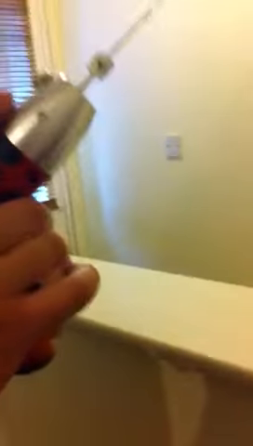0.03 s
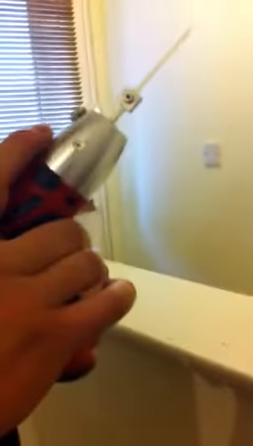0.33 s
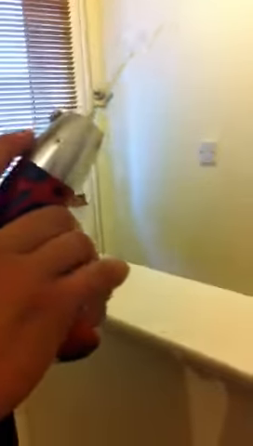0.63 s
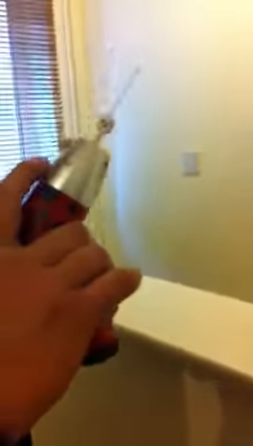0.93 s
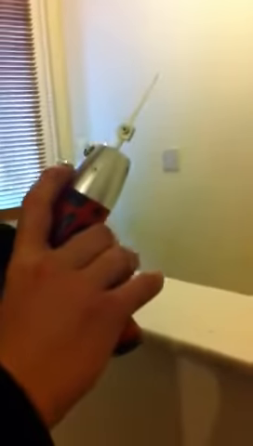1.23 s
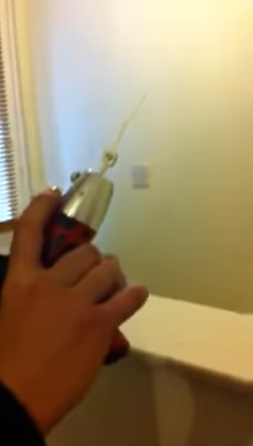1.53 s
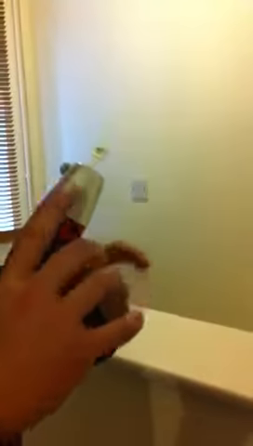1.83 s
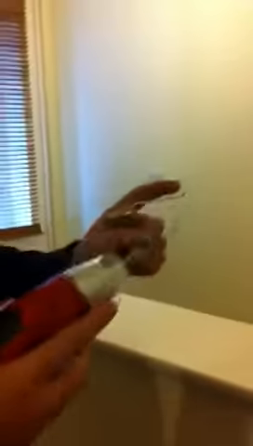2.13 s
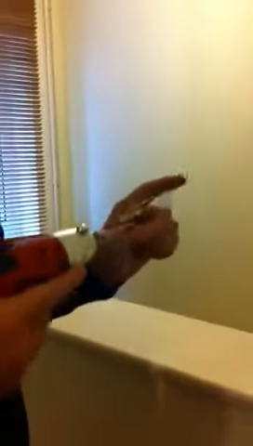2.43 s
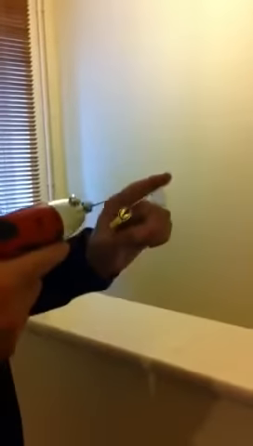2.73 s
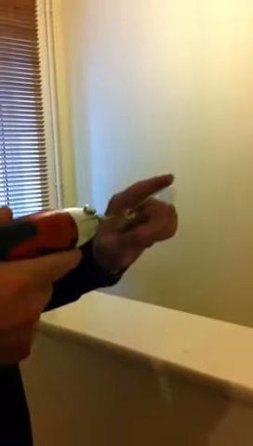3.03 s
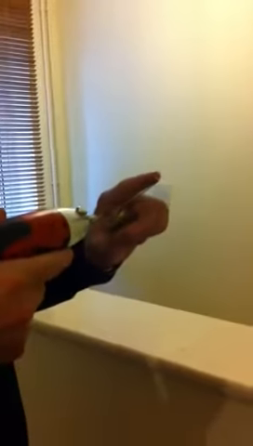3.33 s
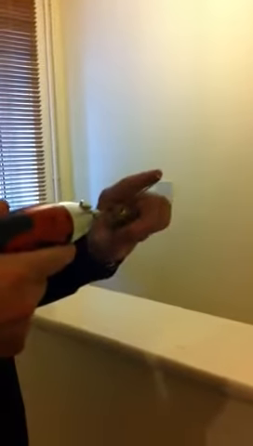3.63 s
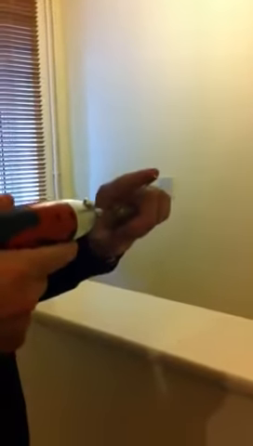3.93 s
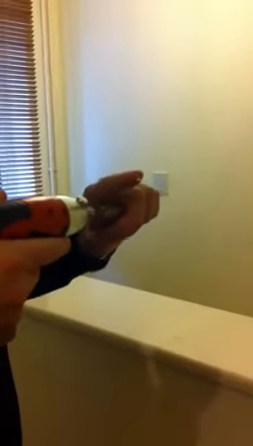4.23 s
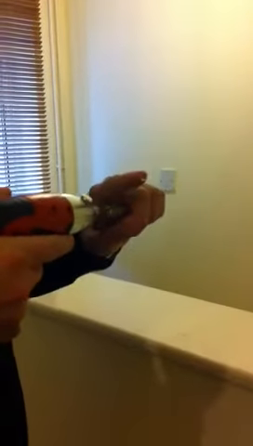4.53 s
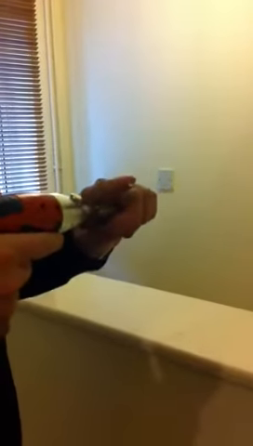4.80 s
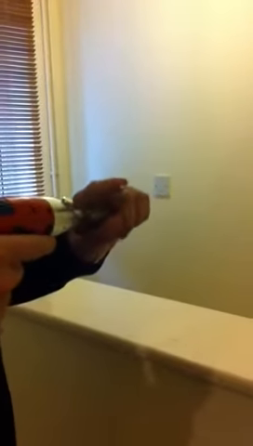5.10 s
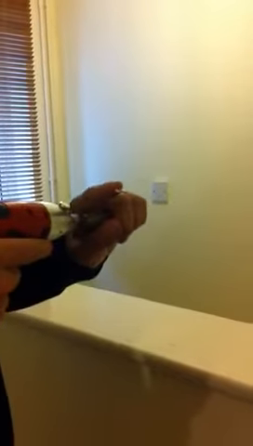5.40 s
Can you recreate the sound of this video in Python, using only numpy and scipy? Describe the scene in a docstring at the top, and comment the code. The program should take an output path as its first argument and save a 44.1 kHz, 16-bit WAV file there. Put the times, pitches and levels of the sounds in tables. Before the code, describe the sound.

An electric lock pick is fitted into a lock with faint clicks, then buzzes harshly against the pins in three quick bursts.

```python
"""In a small, humming room, an electric pick gun is fitted into a hand-held lock cylinder.
The tool knocks in the hand and its needle ticks and squeaks in the keyway. Three pulls of the trigger
then spin the motor up, slapping the needle against the pins up to 195 times a second. The periodic
impacts excite the modes of needle, lock and housing, while pins and springs chatter in noisy bursts.
Mains hum, room noise and the rustle of hands lie beneath."""
import sys
import numpy as np
from scipy import signal
from scipy.fft import rfft, irfft, next_fast_len
from scipy.io import wavfile
from scipy.ndimage import uniform_filter1d

SR = 44100
rng = np.random.default_rng(int(sys.argv[2]) if len(sys.argv) > 2 else 0)


def wav_record(signal):
    """Record a signal, one row per channel, as 16-bit PCM in the file named by sys.argv[1]."""
    frames = np.transpose(np.atleast_2d(signal))
    bounded = np.clip(frames, -1, 1)
    # unit amplitude maps onto the largest positive 16-bit level
    quanta = np.round(bounded * 32767).astype(np.int16)
    wavfile.write(sys.argv[1], SR, quanta)


N = 245195
T = np.arange(N) / SR
CUTOFF_HZ = 15750

# pulls of the trigger: pressed t/s, released t/s, top stroke rate f/Hz
TRIGGER_PULLS = [(4.622, 4.8067, 192.9), (4.914, 5.1198, 195.2), (5.227, 5.6, 192.7)]
# how hard each pull works: needle ring level/dB, pin chatter level/dB, shudder level/dB
PULL_LEVELS = [(-27.7, -28.5, -46.5), (-29, -27.8, -52), (-26.3, -27.9, -59)]
SLOW_HZ, FULL_HZ = 130, 190  # the needle's swing builds up between these stroke rates
# resonances of needle, lock and housing: f/Hz, bandwidth/Hz, level/dB
TOOL_MODES = [(1535, 60, -12), (1730, 70, 1), (2300, 110, -5), (2500, 90, -3), (2690, 110, 2),
              (2890, 90, -3), (3080, 90, 1), (3275, 90, 2), (3660, 110, -7), (3840, 100, -5),
              (4200, 130, -8), (4800, 130, -3), (5370, 120, -5), (10580, 350, -5)]
# spectrum of the pin chatter: f/Hz, relative density level/dB
CHATTER_SPECTRUM = [(90, -57), (180, -35), (420, -23.5), (560, -17), (800, -11), (1100, -3), (1400, -12),
                    (2000, -5), (3000, -1.7), (5200, 0.7), (6200, -7.5), (7500, -4), (11000, 1.5),
                    (15500, -4.5)]
# the lock body rings up when the needle presses on it: t/s, f/Hz, level/dB, half-width/s
LOCK_RINGS = [(4.965, 4400, -37, .025), (5.5, 4330, -36, .035), (5.53, 3830, -39, .04)]
# drone of the housing at full swing: harmonic number, level/dB, change when leant on/dB
DRONE_HARMONICS = [(2, -68, 0), (3, -64, 0), (4, -45, 2.5), (5, -43.5, -3.5), (6, -41, -9), (7, -55, -2)]

# small contacts of tool, needle and pins: t/s, level/dB, decay time/s, ring f/Hz
KEYWAY_TICKS = [(3.458, -39.5, 0.005, 3150), (3.748, -51, 0.0044, 3750), (3.904, -56, 0.007, 3900),
                (3.928, -47, .006, 11800), (4.052, -52, .006, 4040), (4.068, -51, 0.0046, 6400),
                (4.1385, -52, 0.0066, 4000), (4.236, -50.5, .003, 4200), (4.247, -51, 0.0082, 7800),
                (4.272, -39.5, 0.0045, 4530), (4.283, -43, 0.0055, 12500), (4.314, -49, 0.015, 7200),
                (4.345, -51.5, 0.011, 5300), (4.36, -49.5, 0.0035, 3930)]
# spectrum of their scrape: f/Hz, relative density level/dB
SCRAPE_SPECTRUM = [(1000, -12), (2300, -14), (2900, -8.5), (4200, -5), (5500, -3.5), (6500, -13),
                   (9000, -12), (12000, -15), (16000, -10)]
# squeaks of the needle sliding into the keyway: t/s, f/Hz, level/dB, half-width/s
SQUEAKS = [(3.03, 2350, -74, 0.049), (3.345, 1823, -69.5, 0.049)]
# spectrum of a knock on the plastic housing: f/Hz, relative density level/dB
KNOCK_SPECTRUM = [(40, -54), (110, -6), (190, 2), (340, -4.5), (700, 5.5), (1000, 4), (1300, -2),
                  (1600, -22), (2000, -7.5), (2600, -20), (3300, -14.5), (5300, -15), (7700, -18.5),
                  (9500, -30), (16000, -38)]
# dull bumps of the tool against hand and lock: t/s, body level/dB, scuff level/dB
BUMPS = [(1.041, -59, -58), (2.9333, -46, -59), (3.22, -45.5, -59)]
# modes excited by a bump: f/Hz, level/dB, T60/s
BUMP_MODES = [(218, -4.5, 0.11), (620, -1, 0.097), (1105, -7.5, 0.042), (1920, -24, .025),
              (3300, -14.5, 0.021)]
# spectrum of a bump's scuff: f/Hz, relative density level/dB
SCUFF_SPECTRUM = [(100, -63), (600, 9), (2000, 11), (2700, -2), (6000, -11), (16000, -25)]

# slides of the hand on the tool: t/s, level/dB, half-width/s
HAND_SLIDES = [(0.447, -68, .06), (0.65, -68.5, .05), (1.427, -68, 0.069), (2.303, -71, 0.19),
               (2.616, -70, .05), (3.35, -73, 0.11)]
# spectrum of hands and sleeves: f/Hz, relative density level/dB
RUSTLE_SPECTRUM = [(200, -8), (700, 4), (1900, -0.5), (3000, -2), (7000, -9), (16000, -22)]
# mains hum: f/Hz, level/dB, change at the listener's starting spot/dB
HUM_PARTIALS = [(196.2, -76, 11), (300.5, -68.5, -6), (599, -75, 4), (696, -77.5, -2)]
# spectrum of the room noise: f/Hz, relative density level/dB
ROOM_SPECTRUM = [(25, -41), (60, -49), (80, -33), (114, -16.5), (190, -7.5), (300, -6), (420, -12),
                 (620, -13.5), (760, -17), (1840, -21.5), (2760, -29), (6000, -31), (14800, -33)]


def pick_gun():
    """Periodic impacts: one blow per motor turn drives ring and chatter; the housing shakes."""
    speed = motor_speed()
    turns = np.cumsum(speed) / SR
    ring_db, chatter_db, shudder_db = per_pull(PULL_LEVELS).T
    blows = contacts(turns, lag=0, jitter_s=.000008, spread_db=1)
    pitched = disperse(needle_ring(blows, speed, ring_db), spread_s=.000492) + drone(speed, turns)
    noisy = disperse(pin_chatter(blows, speed, turns, chatter_db), spread_s=.000962)
    noisy += shudder(speed, shudder_db)
    return room(pitched, t60=.25, wet_db=-12) + room(noisy, t60=.22, wet_db=-3)


def motor_speed(kick_hz=32, spin_up_s=.0396, friction_hz_per_s=572):
    """First-order lag: the stroke rate in Hz nears its top under power; friction slows it evenly."""
    speed = np.zeros(N)
    for pressed, released, top in TRIGGER_PULLS:
        at = int(pressed * SR)
        start, t = max(speed[at], kick_hz), T[at:]
        powered = np.minimum(t, released) - pressed
        slowing = friction_hz_per_s * np.maximum(t - released, 0)
        speed[at:] = top + (start - top) * np.exp(-powered / spin_up_s) - slowing
    return speed


def per_pull(values):
    """Each pull's value, held until the next pull."""
    return np.asarray(values)[np.searchsorted([row[0] for row in TRIGGER_PULLS[1:]], T)]


def coasting():
    """Seconds since the trigger was let go; 0 under power."""
    return np.maximum(T - per_pull([row[1] for row in TRIGGER_PULLS]), 0)


def swing(speed):
    """Relative amplitude of the needle: 0 when the motor is slow, 1 at full speed."""
    return np.clip((speed - SLOW_HZ) / (FULL_HZ - SLOW_HZ), 0, 1)


def octaves(speed, floor_hz=32):
    """Motor speed in octaves from full speed."""
    return np.log2(np.maximum(speed, floor_hz) / FULL_HZ)


def lean(start_s=5.405, rise_s=.053):
    """Contact load, 0 to 1: late in the last pull the needle is leant on the pins."""
    return np.clip((T - start_s) / rise_s, 0, 1)


def contacts(turns, lag, jitter_s, spread_db):
    """Impulse train: one click per turn, late by `lag` of a turn, uneven in time and strength."""
    count = int(turns[-1] - lag) + 1
    timing, strength = rng.standard_normal((400, 2))[:count].T
    times = np.interp(np.arange(count) + lag + 1e-9, turns, T) + jitter_s * timing
    at = np.clip(times * SR, 0, N - 2)
    force, out = from_db(spread_db * strength), np.zeros(N)
    np.add.at(out, at.astype(int), force * (1 - at % 1))
    np.add.at(out, at.astype(int) + 1, force * (at % 1))
    return out


def needle_ring(blows, speed, effort_db, db_per_octave=2.5, slack_db=-6):
    """Forced resonance: repeated blows give harmonic lines under the modes, and a short bright snap."""
    drive_db = db_per_octave * octaves(speed) + slack_db * (1 - swing(speed) ** 3)
    # the blows soften off the trigger, and leaning damps the needle
    damping_db = -.5 * np.minimum(coasting() / .016, 1) - 6.5 * lean()
    modes = sum(from_db(db) * resonate(blows, hz, width) for hz, width, db in TOOL_MODES)
    snap = .13 * resonate(blows, 4340, 900)
    ring = (swing(speed) ** 2 + .17) * modes + snap
    ring = highpass(ring, 1400, order=4)  # the ring sounds only above about 1.4 kHz, leaving the low band to the drone
    return from_db(effort_db + drive_db + damping_db) * evened(ring)


def pin_chatter(blows, speed, turns, effort_db, db_per_octave=4, lean_db=1.2, burst_s=.0014):
    """Impact and rebound: every stroke throws the pins, which clash and rattle on until the next."""
    level_db = effort_db + db_per_octave * octaves(speed) + lean_db * lean()
    rebounds = from_db(-7) * contacts(turns, lag=.36, jitter_s=.00023, spread_db=6)
    bursts = signal.lfilter([1], [1, -np.exp(-1 / (burst_s * SR))], blows + rebounds + 1e-18)
    loose = from_db(-15 + 2 * drift(900)) * (turns > 0)  # rattle between the bursts
    rattle = (bursts + loose) * rng.standard_normal(N)
    slap = np.diff(blows, prepend=0)  # the needle's bright click leads each burst
    chatter = colour(rattle + slap, CHATTER_SPECTRUM)
    lock = sum(from_db(db) * swell(s, half_width) * evened(resonate(rattle, hz, 180))
               for s, hz, db, half_width in LOCK_RINGS)
    return from_db(level_db + .2 * drift(30)) * evened(chatter) + lock


def disperse(x, spread_s):
    """Dispersion of bending waves in thin steel: the highs arrive first, the lows later."""
    size = next_fast_len(N + 4096)
    hz = np.fft.rfftfreq(size, 1 / SR)
    delay = spread_s * np.clip(1 - hz / CUTOFF_HZ, 0, 1) ** 2
    phase = 2 * np.pi * np.cumsum(delay) * SR / size
    return irfft(rfft(x, size) * np.exp(-1j * phase), size)[:N]


def drone(speed, turns, slack_db=-14):
    """Forced vibration: the housing shakes at harmonics of the stroke rate, weakly at low speed."""
    gain = from_db(slack_db * (1 - swing(speed)) ** 2) * (speed / FULL_HZ) ** 2
    tone = np.zeros(N)
    for harmonic, db, lean_db in DRONE_HARMONICS:
        amplitude = np.sqrt(2) * from_db(db + lean_db * lean() + 1.3 * drift(60))
        tone += amplitude * np.cos(2 * np.pi * harmonic * turns + .18 * drift(50))
    return gain * tone


def shudder(speed, effort_db, critical_hz=174, span_hz=11.5, floor_db=-72):
    """Critical speed: the housing rumbles in two resonances, most as the motor climbs through it."""
    critical = np.exp(-((speed - critical_hz) / span_hz) ** 2) * (coasting() == 0)
    level = from_db(effort_db) * critical + from_db(floor_db) * (speed > 0)
    shake = highpass(rng.standard_normal(N), 150, order=4)  # a small housing radiates little bass
    low, upper = (rms_one(resonate(resonate(shake, hz, 120), hz, 120)) for hz in (198, 500))
    return level * (low + from_db(-4) * upper)


def keyway_ticks(scrape_db=-9, ring_db=1):
    """Sliding contact: the needle catches a pin and scrapes over it; each contact rings briefly."""
    friction = from_db(3 * drift(1500)) * rng.standard_normal(N)
    slips, rings = np.zeros(N), np.zeros(N)
    for s, db, decay_s, hz in KEYWAY_TICKS:
        slip = from_db(db) * dying(s, decay_s) * friction
        slips += slip
        rings += resonate(slip, hz, 650)
    return from_db(ring_db) * rings + from_db(scrape_db) * colour(slips, SCRAPE_SPECTRUM)


def squeaks(width_hz=50):
    """Frictional excitation: steel rubbing on brass sings in one narrow resonance."""
    out = np.zeros(N)
    for s, hz, db, half_width in SQUEAKS:
        tone = rms_one(resonate(rng.standard_normal(N), hz, width_hz))
        out += from_db(db) * swell(s, half_width) * tone
    return out


def handling(knock_s=1.6836, knock_db=-14, scuff_s=.017):
    """Impulse responses: a hollow knock on the housing, and dull, scuffing bumps on hand and lock."""
    click = np.zeros(N)
    click[int(knock_s * SR)] = from_db(knock_db)
    bumps = sum(from_db(db) * struck(s, BUMP_MODES) for s, db, _ in BUMPS)
    bumps = highpass(bumps + 1e-18, 150, order=2)  # small bodies radiate little bass
    scuffs = sum(from_db(db) * dying(s, scuff_s) for s, _, db in BUMPS) * rng.standard_normal(N)
    return colour(click, KNOCK_SPECTRUM) + bumps + colour(scuffs, SCUFF_SPECTRUM)


def struck(start, modes):
    """Free vibration: the modes of a body decay exponentially after one blow."""
    age, out = np.arange(SR // 4) / SR, np.zeros(N)
    at = int(start * SR)
    for hz, db, t60 in modes:
        out[at:at + len(age)] += from_db(db - 60 * age / t60) * np.sin(2 * np.pi * hz * age)
    return out


def rustle(rest_db=-72.5):
    """Friction noise: hands and sleeves never quite rest, and swell as the hand slides on the tool."""
    slides = sum(from_db(db) * swell(s, half_width) for s, db, half_width in HAND_SLIDES)
    level = np.hypot(from_db(rest_db), slides) * from_db(2 * drift(40))
    return level * colour(rng.standard_normal(N), RUSTLE_SPECTRUM)


def mains_hum(move_from_s=.7, move_to_s=1.86, waver_db=2.6):
    """Standing waves: each partial of the hum changes level as the listener moves through the room."""
    at_start = np.clip((move_to_s - T) / (move_to_s - move_from_s), 0, 1)
    hum = np.zeros(N)
    for hz, db, start_db in HUM_PARTIALS:
        amplitude = np.sqrt(2) * from_db(db + start_db * at_start + waver_db * drift(6.06))
        hum += amplitude * np.sin(2 * np.pi * hz * T + .35 * drift(7.5))
    return hum


def room_noise(level_db=-64):
    """Stationary noise: a soft, low rush fills the room."""
    return from_db(level_db) * colour(rng.standard_normal(N), ROOM_SPECTRUM)


def room(x, t60, wet_db, dull_hz=6000):
    """Reverberation: direct sound plus a dense tail whose treble dies sooner."""
    age = np.arange(SR // 2) / SR
    noise = rng.standard_normal(len(age))
    low = signal.sosfilt(signal.butter(1, dull_hz, fs=SR, output="sos"), noise)
    decay = from_db(-60 * age / t60)
    tail = (low * decay + (noise - low) * decay ** 2) * (age > .003)
    return x + from_db(wet_db) * signal.fftconvolve(x, tail / np.linalg.norm(tail))[:N]


def colour(x, spectrum, size=8192):
    """Minimum-phase filter of unit power gain that follows a spectrum."""
    hz, db = np.transpose(spectrum)
    gain = from_db(np.interp(np.log(np.fft.rfftfreq(size, 1 / SR) + 1), np.log(hz), db))
    cepstrum = irfft(np.log(gain))
    cepstrum[1:size // 2] *= 2
    cepstrum[size // 2 + 1:] = 0
    response = irfft(np.exp(rfft(cepstrum)))
    return signal.fftconvolve(x, response / np.linalg.norm(response))[:N]


def resonate(x, hz, width_hz):
    """Second-order resonance of gain 1 at its peak."""
    r = np.exp(-np.pi * width_hz / SR)
    feedback = [1, -2 * r * np.cos(2 * np.pi * hz / SR), r * r]
    return signal.lfilter(np.array([1, 0, -1]) * (1 - r * r) / 2, feedback, x + 1e-18)


def highpass(x, hz, order):
    """Maximally flat high-pass filter."""
    return signal.sosfilt(signal.butter(order, hz, "high", fs=SR, output="sos"), x)


def dying(start, decay_s):
    """An envelope that jumps to 1 and decays exponentially."""
    age = T - start
    return (age >= 0) * np.exp(-np.clip(age / decay_s, 0, 40))


def swell(peak_s, half_width_s):
    """A bell-shaped envelope of height 1."""
    return np.exp(-np.minimum(((T - peak_s) / half_width_s) ** 2, 60))


def drift(rate_hz):
    """Random fluctuation: straight lines through 4000 values of spread 1, holding the last."""
    knots = rng.standard_normal(4000)
    return np.interp(T * rate_hz, np.arange(len(knots)), knots)


def evened(x):
    """Hold the running rms near 1 while the signal sounds."""
    power = uniform_filter1d(x ** 2, size=1500)
    return x / np.sqrt(np.maximum(power, 0) + np.mean(x ** 2) / 20)


def rms_one(x):
    """Scale to rms 1."""
    return x / np.sqrt(np.mean(x ** 2) + 1e-20)


def from_db(db):
    """Decibels to gain."""
    return 10 ** (np.asarray(db) / 20)


def scene():
    """Superposition: the tool works at arm's length; the handling is nearer and drier."""
    keyway = room(keyway_ticks() + squeaks(), t60=.24, wet_db=-6.5)
    near = room(handling(), t60=.047, wet_db=-16)
    return (pick_gun() + keyway + near + mains_hum() + rustle() + room_noise())[None]


def record(dry):
    """Band limiting: a steep low-pass cuts the highest treble."""
    return signal.sosfilt(signal.ellip(12, .1, 80, CUTOFF_HZ, fs=SR, output="sos"), dry)


dry = scene()
out = record(dry)
wav_record(out)
```